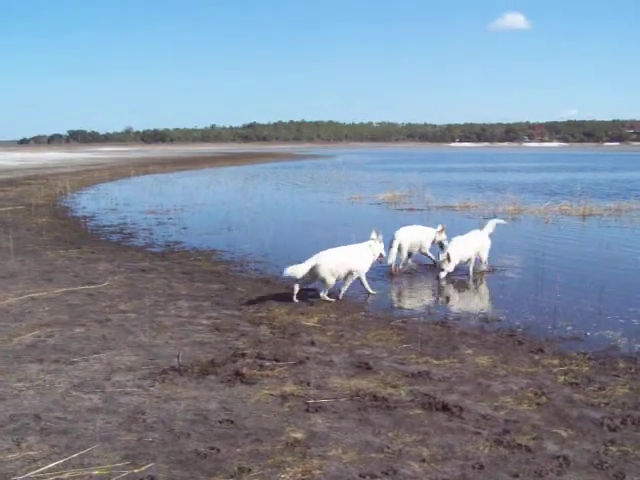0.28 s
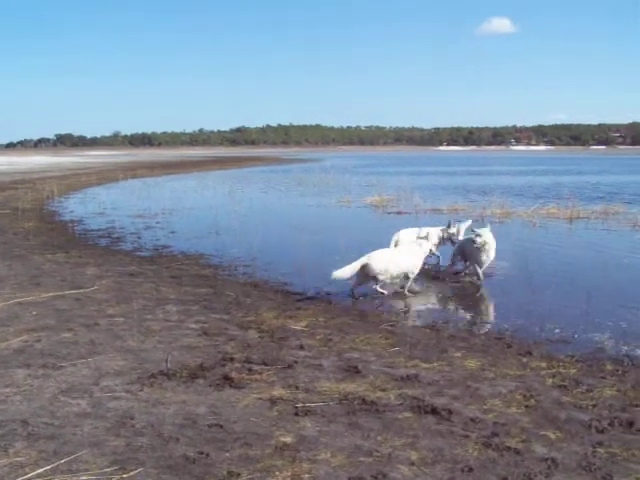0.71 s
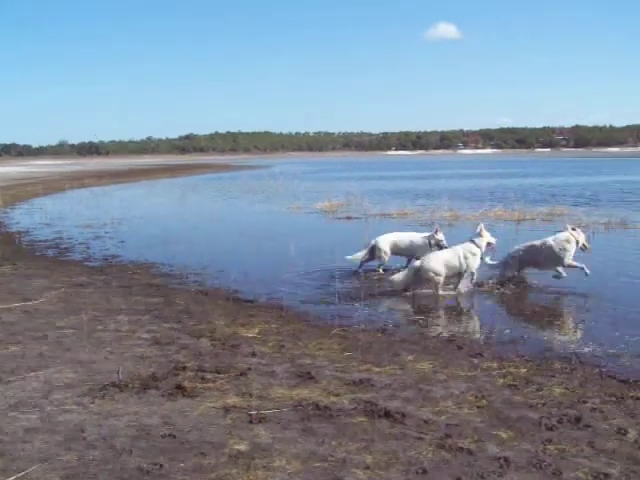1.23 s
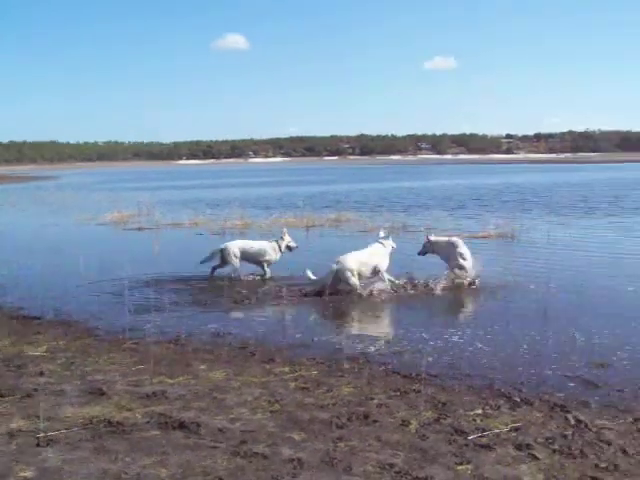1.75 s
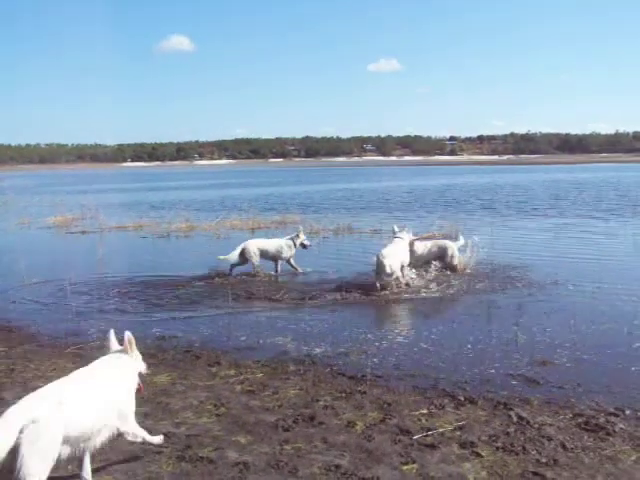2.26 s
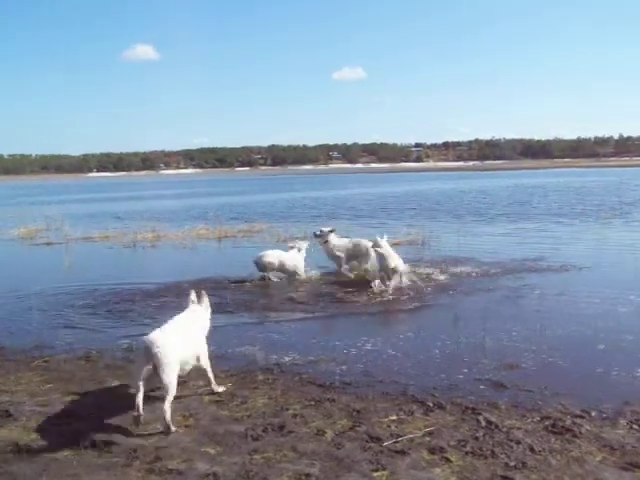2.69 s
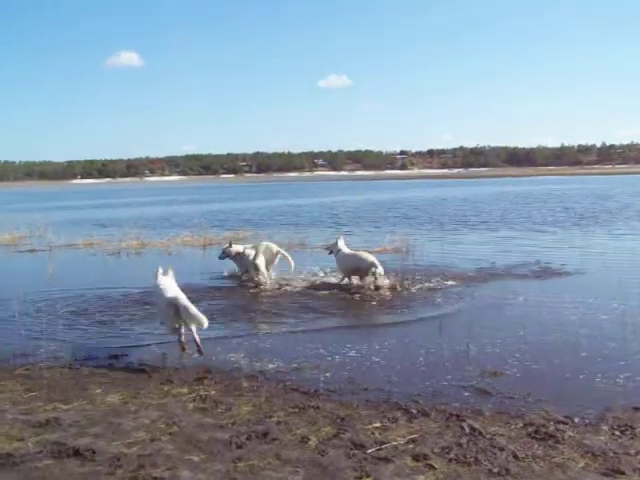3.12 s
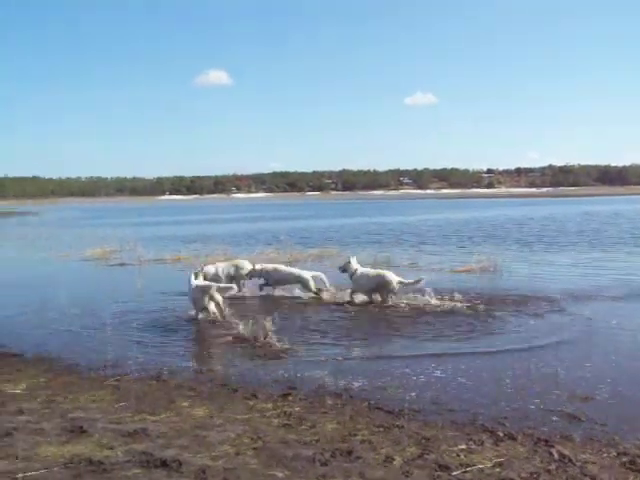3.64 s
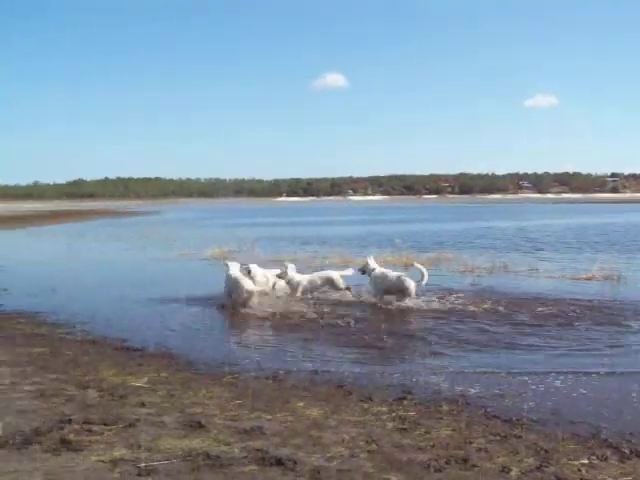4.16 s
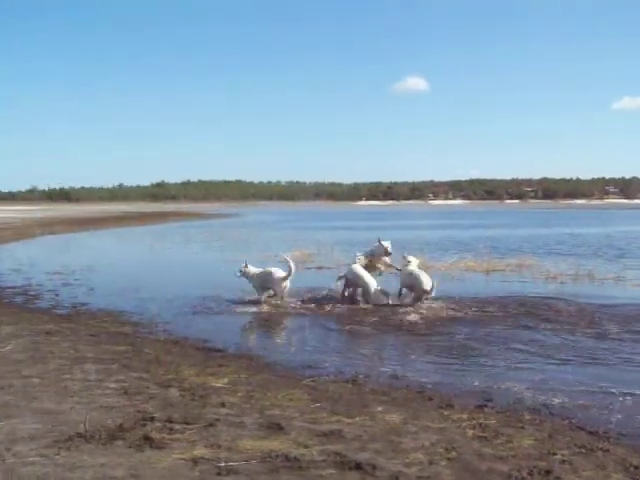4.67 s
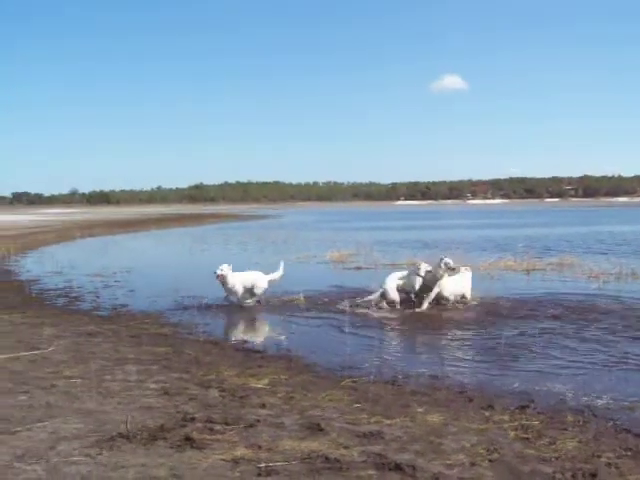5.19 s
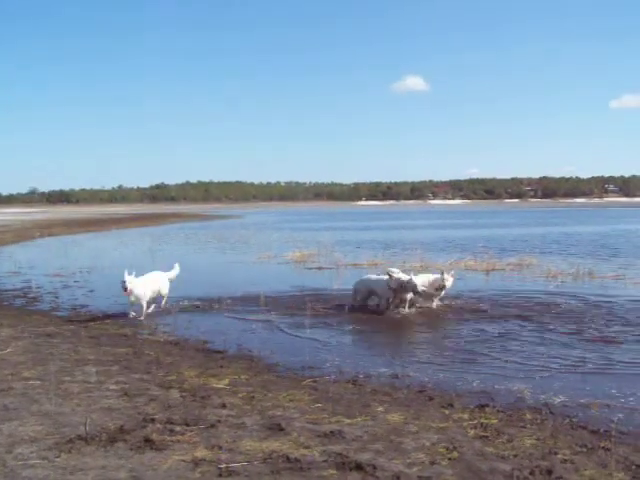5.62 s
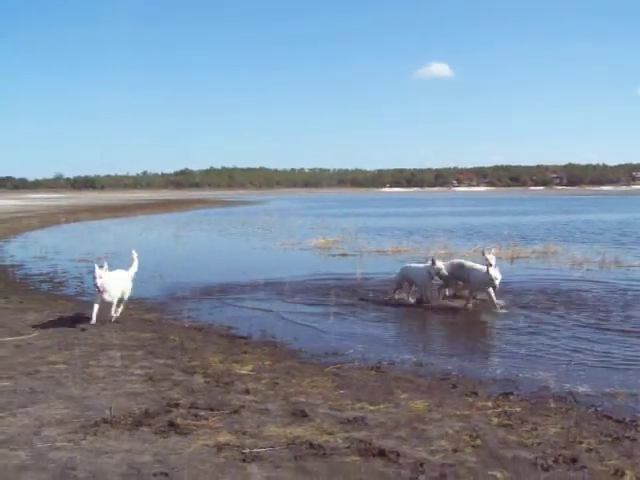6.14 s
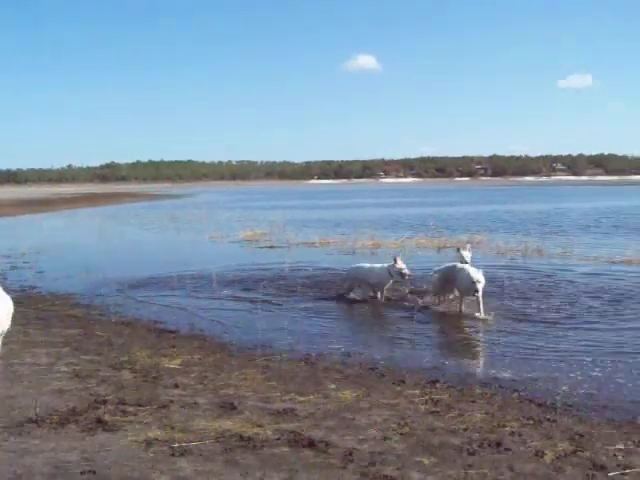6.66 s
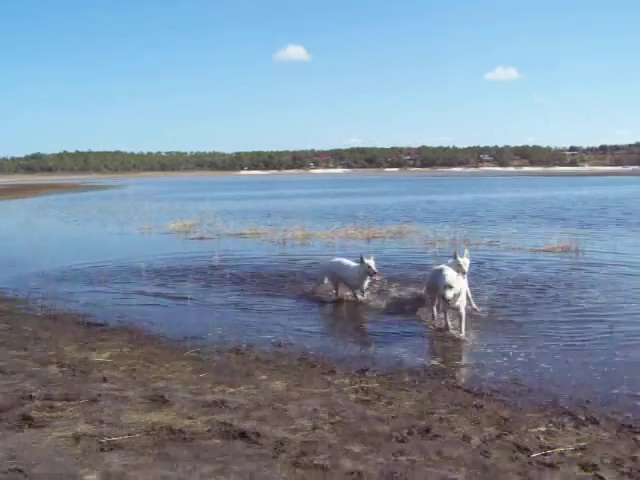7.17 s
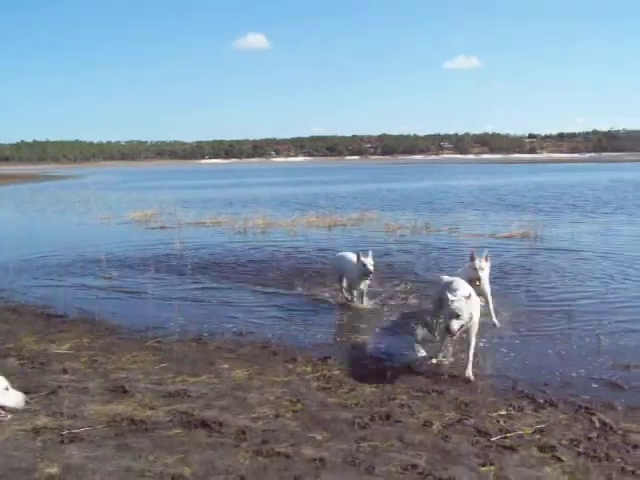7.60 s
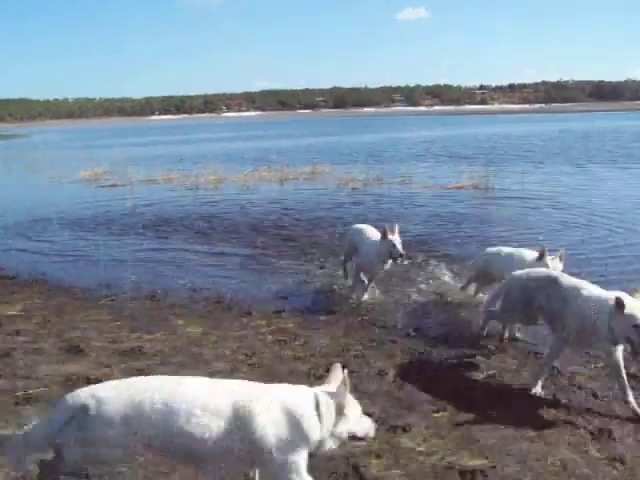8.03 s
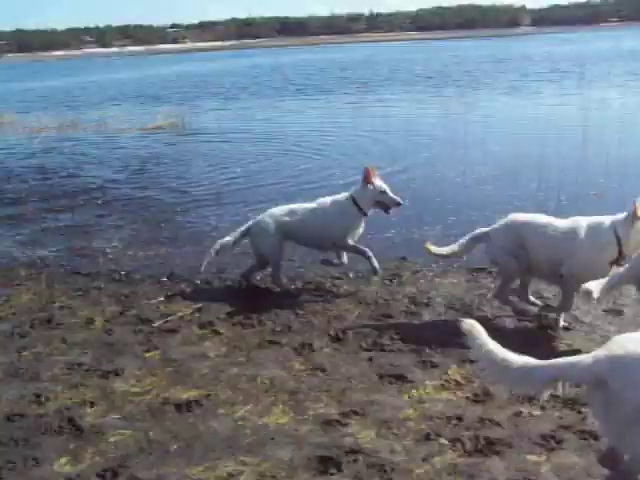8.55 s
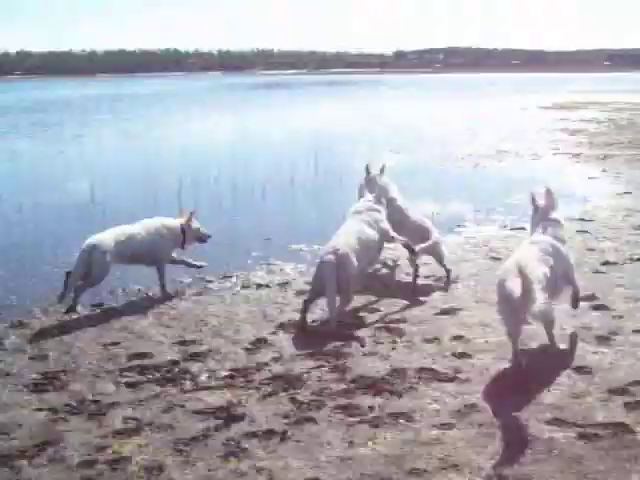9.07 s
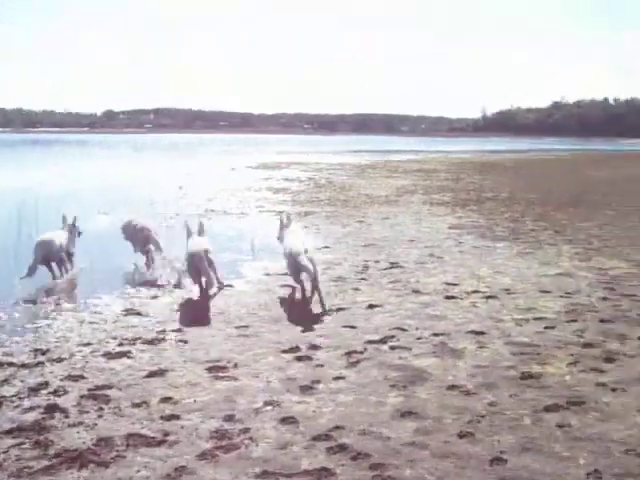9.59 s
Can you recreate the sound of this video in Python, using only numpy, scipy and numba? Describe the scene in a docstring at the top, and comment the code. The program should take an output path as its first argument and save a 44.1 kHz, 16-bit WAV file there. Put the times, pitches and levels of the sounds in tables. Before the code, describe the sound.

Rough low wind thumping on a camera microphone, dogs' paws slapping and churning lake shallows, splashes growing nearer and clearer as the wind fades.

```python
"""Lake shallows in the open air, dogs a few metres from a small camera, wind on its microphone port.
First hard eddies, swings of the diaphragm, overload the microphone while the dogs wade with light slaps.
Then they romp: torn noise makes the spray, short bursts the slaps, small rings the drops and bubbles.
Last they gallop out: spatter and hollow plunges come forward as the wind eases with the camera's turn."""
import sys
import numpy as np
from scipy import signal
from scipy.fft import rfft, irfft
from scipy.io import wavfile
from scipy.ndimage import uniform_filter1d
from numba import njit

SR = 44100
rng = np.random.default_rng(int(sys.argv[2]) if len(sys.argv) > 2 else 0)


def master(y):
    """Save y as 16-bit WAV."""
    cut = np.clip(np.atleast_2d(y).T, -1, 1)
    pcm = np.round(cut * 32767)  # scale
    wavfile.write(sys.argv[1], SR, pcm.astype(np.int16))


N = 433062  # length in samples

# how hard the dogs churn the water: start_s, spray level_db
CHURN = [(0.0, -45), (0.3, -37.5), (1.0, -34.5), (1.4, -30), (2.3, -24), (3.8, -23), (5.2, -26.5),
         (5.9, -28.5), (6.4, -28.5), (7.0, -25), (8.1, -26), (9.25, -27.5), (9.82, -26)]
# sheets of water thrown up by a leap: start_s, lift_db above the churn
SURGES = [(0.63, 8.5), (1.121, 7.5), (1.62, 3.5), (2.29, 3), (3.162, 3.5), (5.87, 4.5), (6.86, 3),
          (7.41, 0.5), (9.69, 6), (9.79, 6.5)]
SURGE_RISE_S, SURGE_FADE_S = 0.0032, 0.11
# brief dips in the splashing: middle_s, depth_db, half_length_s
LULLS = [(0.61, 3.5, 0.066), (1.874, 3.5, 0.021), (2.423, 4.5, 0.029), (3.549, 6, 0.045), (4.12, 5, 0.034),
         (5.442, 4, 0.12), (8.212, 1, 0.063), (9.39, 5, 0.05), (9.612, 5, 0.016), (9.753, 5.5, 0.03)]
SLOSH_SWING = 1.4  # dB the slosh drops per dB of lull
# the dogs rush the shore over this span: start_s, end_s
APPROACH_S = [7.4, 7.73]
# before and after the rush: far_db, near_db
MIST_DB, SLOSH_DB, SPATTER_DB = [-10.5, -8.5], [-8.5, -10], [-20, -9]
# paws slapping the surface: peak_s, level_db, pitch_hz
SLAPS = [(0.3035, -15, 2630), (0.6304, -15.5, 2153), (0.6561, -21, 2347), (0.7564, -16, 2090),
         (0.8649, -10.5, 2270), (1.0134, -11, 3220), (1.111, -13, 2780), (1.1528, -19, 2239),
         (1.171, -9, 2730), (1.6095, -11, 2650), (2.761, -6.5, 3600), (2.782, -9, 2670),
         (3.1556, -6.5, 3900), (3.667, -6, 3730), (3.804, -7, 2110), (3.847, -2.5, 3070),
         (3.9822, -7, 3670), (4.079, -2, 3700), (4.153, -10, 3900), (4.1898, -6, 3630), (4.5112, -6, 3570),
         (4.9065, -12, 2400), (5.074, -9, 3700), (5.2714, -8, 3580), (5.545, -7, 3580),
         (5.6726, -9.5, 3530), (5.7328, -12.5, 2465), (6.21, -7, 3400), (6.335, -8, 2870),
         (6.5545, -14, 2150), (6.6973, -6, 2906), (6.812, -8.5, 3360), (6.849, -6.5, 3930),
         (6.905, -9, 2900), (6.9484, -8, 3040), (7.039, -10, 3400), (7.13, -9.5, 2560), (7.2845, -7, 3240),
         (7.305, -7, 2480), (7.414, -6.5, 2880), (7.5463, -6, 3320), (7.697, -8.5, 3100), (7.727, -9, 2282),
         (7.8515, -9.5, 3670), (7.904, -9.5, 2140), (7.916, -8, 3780), (8.013, -9.5, 3000),
         (8.098, -10, 3000), (8.116, -8.5, 2200), (8.145, -12, 2560), (8.203, -10, 1900),
         (8.224, -14.5, 2040), (8.303, -9.5, 3060), (8.325, -12, 3400), (8.4115, -9.5, 1990),
         (8.425, -17, 3100), (8.4387, -13, 3620), (8.498, -9.5, 2700), (8.563, -8, 3300), (8.58, -14, 3000),
         (8.602, -11, 3640), (8.6536, -7, 2070), (8.6743, -10.5, 4758), (8.704, -7.5, 3660),
         (8.722, -15, 2900), (8.9258, -4.5, 2220), (8.9774, -14.5, 2217), (8.994, -14, 3500),
         (9.012, -14, 2810), (9.05, -17, 2400), (9.1618, -10, 2060), (9.2, -11.5, 2600),
         (9.2698, -13, 3466), (9.287, -11, 2799), (9.327, -10, 3300), (9.452, -12, 2500),
         (9.461, -4.5, 3000), (9.529, -9.5, 2120), (9.575, -12, 3220), (9.675, -12, 2160),
         (9.7812, -11, 2885)]
BURST_LOW_HZ, BURST_HIGH_HZ = 1100, 5300
# paws plunging close by, an air pocket closing: start_s, level_db, pitch_hz
PLUNGES = [(7.914, -18, 493), (8.014, -18, 576), (8.302, -21, 308), (8.325, -19, 496), (8.437, -8.5, 560),
           (8.504, -20, 490), (8.654, -20, 530), (8.901, -6, 513), (9.086, -14, 440), (9.269, -20, 353),
           (9.443, -14, 510), (9.46, -18, 450), (9.526, -19, 423), (9.651, -14, 442)]
# bodies ploughing through, water without a sharp front: middle_s, level_db, half_length_s, centre_hz
GUSHES = [(1.629, -24, 0.006, 1400), (2.884, -21, 0.0076, 1340), (5.571, -21.5, 0.0091, 3500),
          (5.848, -19, 0.012, 2960), (8.412, -22, 0.0051, 3000), (8.783, -20, 0.0088, 2280),
          (9.088, -21.5, 0.0073, 3430), (9.478, -22.5, 0.0079, 2400)]
GUSH_WIDTH = 1.3  # band edges as a factor either side of the centre
# brief bright ticks, many of them the bright edge of a slap: peak_s, level_db, pitch_hz
TICKS = [(0.8164, -21, 6440), (2.5689, -15, 6190), (3.1526, -19, 5600), (6.6447, -14.5, 6600),
         (7.0842, -16, 6460), (7.2598, -14.5, 6640), (7.5456, -14, 5500), (7.6055, -16, 6560),
         (7.7756, -14, 5500), (8.0156, -14, 5250), (8.1133, -10.5, 6560), (8.1996, -11.5, 6540),
         (8.3049, -13, 5500), (8.4995, -11, 5230), (8.6007, -16, 6270), (8.7813, -13, 6400),
         (8.9744, -14, 6590), (9.5261, -15, 6400)]
# short warbling water tones, one sweeping up steeply, one nearly level, one rising a little:
# start_s, start_hz, rise_factor, length_s, level_db
WATER_TONES = [(0.603, 896, 3.8, 0.036, -38), (8.478, 1206, 1.03, 0.06, -32),
               (9.488, 1097, 1.2, 0.014, -31)]
# colour of water sounds through the camera body, a notch near 800 Hz: pitch_hz, level_db
BODY = [(150, -29), (300, -9), (520, -6), (680, -11), (790, -19), (950, -7.5), (1250, -8), (1600, -9.5),
        (2150, -3), (2600, -5), (3600, -2), (3950, -6), (4400, -9.5), (5050, -7.5), (5800, -9),
        (6500, -5.5), (7600, -18.5), (8740, -39), (11400, -72.5)]
# wind on the port, gusts swelling and easing: start_s, level_db
WIND = [(0.0, -16), (1.3, -18.5), (2.1, -18.5), (3.0, -21.5), (3.5, -19), (3.85, -24), (4.5, -19.5),
        (5.2, -18), (5.85, -21), (6.15, -17), (6.85, -22.5), (7.1, -21.5), (7.45, -21.5), (7.55, -27),
        (8.4, -30.5), (9.0, -42.5), (9.35, -36), (9.82, -35)]
# deep rumble and sharp eddies against the wind: start_s, deep_db, sharp_db
WIND_TONE = [(0, -7, -9.5), (2, -17.5, -8.5), (2.8, -17, -7), (3.6, -22, -4), (4.3, -8.5, -6.5),
             (5.2, -4.5, -12), (7.4, -13, -11), (8.4, -1, -23), (9.1, 0.5, -1), (9.82, 1.5, -10)]
# spectrum of the wind's rumble: pitch_hz, level_db (per Hz, relative)
RUMBLE = [(12, -32.5), (20, -15.5), (64, -9), (119, 4), (248, -2.5), (400, -18), (520, -43.5), (880, -120)]
# hardest eddies on the port: peak_s, level_db, pitch_hz
BUFFETS = [(0.009, 0, 245), (0.0874, -3, 175), (0.1132, 0.5, 187), (0.1514, -2, 217), (0.171, 7, 312),
           (0.3508, 1.5, 179), (0.415, 5.5, 216), (0.473, 3, 167), (0.5233, 0.5, 239), (0.5869, 0.5, 170),
           (0.687, -1.5, 199), (0.7218, 0, 196), (0.7523, 2, 170), (0.839, 1, 207), (0.8989, 1, 155),
           (0.9548, -4.5, 202), (0.9723, -5, 225), (1.0153, 3, 246), (1.0926, -1, 154), (1.1115, 1, 245),
           (1.2444, -2.5, 192), (1.2795, 0, 243), (1.3832, -6, 229), (1.3995, -3, 176), (1.4357, -1.5, 177),
           (1.5931, -3, 241), (1.689, -3.5, 220), (1.736, -10, 260), (1.7746, 2, 217), (1.8407, -1.5, 166),
           (1.9323, -3, 218), (1.991, 2.5, 205), (2.0826, -1, 230), (2.3958, -8, 205), (2.6064, 0.5, 229),
           (2.9309, -3.5, 205), (2.9762, -5.5, 410), (3.0035, -5.5, 211), (3.4404, -5.5, 229),
           (3.4533, -1.5, 253), (3.5121, -2.5, 225), (4.05, -6.5, 412), (4.07, -7.5, 210),
           (4.4169, -7.5, 301), (4.4773, -6.5, 208), (4.695, -7.5, 149), (4.7374, -11, 255),
           (4.813, -6, 150), (4.8304, -3, 231), (4.9223, -1.0, 147), (4.9502, -3, 174), (4.9624, -2, 281),
           (5.022, -5.5, 230), (5.121, -4.5, 150), (5.1917, 0, 146), (5.209, 0.5, 153), (5.2484, -5.5, 209),
           (5.296, -5.5, 140), (5.3291, -3.5, 220), (5.409, -1, 190), (5.4501, -1.5, 241),
           (5.5741, -4, 170), (5.5906, -5.5, 240), (5.6834, -3.0, 188), (5.711, -3.5, 179),
           (6.0357, -0.5, 239), (6.1128, -5.5, 284), (6.1394, 3, 217), (6.1883, -4, 209),
           (6.3055, -3.5, 227), (6.347, -3, 231), (6.4204, -2.5, 186), (6.6356, -7.5, 176),
           (6.788, -1.5, 203), (6.9982, -5.5, 170), (7.0132, -9, 180), (7.0508, -2.5, 184),
           (7.117, -6.5, 284), (7.131, -7.5, 222), (7.4663, -6, 193)]
HEAVE_DB, HEAVE_PITCH = -9, 0.55  # slower heave around each hard eddy: dB and factor against that eddy
CLIP = .69  # level where the microphone input flattens (full scale = 1)
TOP_HZ = 8850  # top of the recorded band


def spray():
    """Sheets of water that tear in patches, falling drops, crackle, and bubbles that chirp upwards."""
    time_s = np.arange(N) / SR
    slosh_db = np.interp(time_s, APPROACH_S, SLOSH_DB)
    mist_db = np.interp(time_s, APPROACH_S, MIST_DB)
    crackle = scatter(count=14000, lo_hz=1440, hi_hz=9000, cycles=2.1, glide=0.58, tail_db=1.0)
    blips = scatter(count=1500, lo_hz=1310, hi_hz=8010, cycles=35.4, glide=1.35, tail_db=1.5)
    bubbles = scatter(count=500, lo_hz=996, hi_hz=7380, cycles=55, glide=1.5, tail_db=0.5)
    # handfuls of drops land together
    when, size = rng.random((700, 2)).T
    falls = 0.98 + puffs(when * (N - 1) / SR, 6.5 * size - 7.0, rise_s=0.0018, fade_s=0.0018)
    patches = undb(1.1 * walk(40))
    torn = patches * falls * (rng.standard_normal(N) + .5 * crackle)
    water = colour(unit(torn) + 0.26 * blips + 0.18 * bubbles, BODY)
    # each band of pitch comes and goes on its own, as drops of one size would
    bands = split(water, [600, 1350, 1950, 3300, 3950, 4500, 5600, 7000])
    bands = [part * undb(1.0 * walk(9) + 1.08 * walk(35)) for part in bands]
    # the finest mist arrives in short puffs
    mist = unit(sum(bands[5:]) * undb(0.37 * walk(10) + 1.5 * walk(90)))
    slosh = unit(sum(bands[:2]))
    sheet = unit(sum(bands[2:5]))
    low = undb(churn(SLOSH_SWING) + slosh_db) * slosh
    return low + undb(churn(1)) * (sheet + undb(mist_db) * mist)


def churn(swing):
    """Spray level in dB: the slow effort, lifted at once by each leap and sagging in each lull."""
    t = np.arange(0, N / SR + .002, .002)  # every 2 ms
    effort_db = np.interp(t, *np.transpose(CHURN))
    lift = sum(up * np.exp(np.minimum((t - s) / SURGE_RISE_S, (s - t) / SURGE_FADE_S)) for s, up in SURGES)
    sag = sum(down * np.exp(-((t - s) / half) ** 2) for s, down, half in LULLS)
    return np.interp(np.arange(N) / SR, t, effort_db + lift - swing * sag)


def slaps():
    """Each slap: a few quick swings at its pitch inside a broad burst of torn water, then spatter."""
    s, db, _ = np.transpose(SLAPS)
    grain = undb(2.0 * walk(500)) * band(rng.standard_normal(N), BURST_LOW_HZ, BURST_HIGH_HZ, order=1)
    # the mix of coarse and fine drops keeps changing
    grain = sum(part * undb(3.0 * walk(60)) for part in split(grain, [1500, 2300, 3500, 5200, 6800]))
    spatter_db = np.interp(s, APPROACH_S, SPATTER_DB)
    burst = puffs(s, db - 15.5, rise_s=0.0015, fade_s=0.0018)
    spatter = puffs(s, db + spatter_db, rise_s=0.0022, fade_s=0.0053)
    splash = colour((burst + spatter) * grain, BODY) / np.std(colour(grain, BODY))
    return splash + swings(SLAPS, turns=1.66, edge=0.81)


def plunges():
    """A closing air pocket rings as a hollow plop that dies within a few cycles."""
    s, db, hz = np.transpose(PLUNGES)
    plops = rings(N, s, hz, 8.6 + 0 * s, 0.98 + 0 * s, undb(db))
    return band(plops, 120, 1500, order=1)


def gushes():
    """Each gush is rough noise around its centre that swells and ebbs."""
    t = np.arange(N) / SR
    rough = undb(2.9 * walk(300)) * rng.standard_normal(N)
    out = np.zeros(N)
    for at, level_db, half, hz in GUSHES:
        swell = np.exp(-((t - at) / half) ** 2)
        out += undb(level_db) * swell * unit(band(rough, hz / GUSH_WIDTH, hz * GUSH_WIDTH))
    return out


def ticks():
    """Brief bright ticks around 5 to 6.6 kHz, each a few swings that swell and die quickly."""
    return swings(TICKS, turns=3.8, edge=1.1)


def water_tones():
    """Short water tones that swell, warble in level and pitch and die, each with its own rise."""
    out = np.zeros(N)
    warble, wobble = undb(4.5 * walk(140)), 1 + 0.04 * walk(120)  # of level, of pitch
    for at, hz, rise, length, level_db in WATER_TONES:
        i = np.arange(int(at * SR), int((at + length) * SR))
        part = (i / SR - at) / length
        swell = np.abs(np.sin(np.pi * part)) ** 0.56
        turns = np.cumsum(hz * rise ** part * wobble[i]) / SR
        out[i] += undb(level_db) * swell * np.sin(2 * np.pi * turns)
    return out * warble


def wind():
    """Eddies of all sizes pass the port, each a push and a rebound, bunched in flutters over a deep rumble."""
    level_db, = curves(WIND)
    deep_db, sharp_db = curves(WIND_TONE)
    flutter = 1.5 * np.tanh(walk(28) / 1.5)  # soft limit on the swings
    deep = unit(band(rng.standard_normal(N), 34, 75))
    rumble = unit(colour(rng.standard_normal(N), RUMBLE))
    big = scatter(count=1100, lo_hz=81.3, hi_hz=243.5, cycles=7.4, glide=0.3, tail_db=1.5)
    small = scatter(count=2200, lo_hz=257.0, hi_hz=646, cycles=8.4, glide=0.67, tail_db=3.5)
    eddies = unit(undb(1.6 * flutter) * (0.55 * rumble + big))
    sharp = unit(undb(3.5 * flutter + 2.5 * walk(60)) * small)
    push = undb(level_db) * (undb(deep_db) * deep + eddies + undb(sharp_db) * sharp)
    # the diaphragm is pushed smoothly, and a vent bleeds off the slowest pressure
    return band(push, 33, 610, order=3) + buffets()


def buffets():
    """Each hard eddy is one sharp swing of the diaphragm inside a slower heave and rebound."""
    heaves = [(s, db + HEAVE_DB, hz * HEAVE_PITCH) for s, db, hz in BUFFETS]
    return swings(BUFFETS, turns=0.34, edge=1.13) + swings(heaves, turns=0.76, edge=1.54)


def swings(table, turns, edge):
    """Each row swells to a few swings at its pitch, at a random phase, and dies as quickly."""
    out = np.zeros(N)
    phases = rng.random(len(table))
    for (at, level_db, hz), phase in zip(table, phases):
        i = np.arange(max(int((at - .03) * SR), 0), min(int((at + .03) * SR), N))  # 30 ms either side
        t = i / SR - at
        swell = np.exp(-np.abs(t * hz / turns) ** edge)
        out[i] += undb(level_db) * swell * np.cos(2 * np.pi * (hz * t + phase))
    return out


def scatter(count, lo_hz, hi_hz, cycles, glide, tail_db):
    """Many small rings at random times and pitches, a few of them bigger by up to 4 * tail_db."""
    when, pitch, rarity, sign = rng.random((count, 4)).T
    size = undb(tail_db * np.minimum(-np.log(1 - rarity), 4)) * np.sign(sign - .5)
    hz = lo_hz * (hi_hz / lo_hz) ** pitch
    one = np.ones(count)
    return unit(rings(N, when * N / SR, hz, cycles * one, glide * one, size))


@njit
def rings(n, at, hz, cycles, glide, size):
    """Damped sines that lose 60 dB in so many cycles while the pitch slides by the factor glide."""
    out = np.zeros(n)
    for k in range(len(at)):
        length = int(cycles[k] * SR / hz[k])
        step = 2 * np.pi * hz[k] / SR
        fade = np.exp(-np.log(1000.) / length)
        slide = glide[k] ** (1. / length)
        i, phase, a = int(at[k] * SR), 0., size[k]
        for j in range(i, min(i + length, n)):
            out[j] += a * np.sin(phase)
            phase, step, a = phase + step, step * slide, a * fade
    return out


def puffs(s, db, rise_s, fade_s):
    """Envelope of bursts that peak at the given times."""
    marks = np.zeros(N)
    np.add.at(marks, (s * SR).astype(int), undb(db))
    t = np.arange(-441, 2206) / SR  # 10 ms before the peak to 50 ms after
    shape = np.where(t < 0, np.exp(t / rise_s), np.exp(-t / fade_s))
    return signal.fftconvolve(marks, shape)[441:441 + N]


def walk(rate):
    """Random levels held 1 / rate s and slewed twice; rms 1."""
    k = int(SR / rate)
    held = np.repeat(rng.standard_normal(N // k + 1), k)
    return unit(uniform_filter1d(uniform_filter1d(held, k), k)[:N])


def split(x, centres_hz):
    """Overlapping bands that add up to x again."""
    spec = rfft(x)
    at = np.log(np.arange(N // 2 + 1) * SR / N + 1)
    return [irfft(spec * np.interp(at, np.log(centres_hz), row), N) for row in np.eye(len(centres_hz))]


def colour(x, points):
    """Causal minimum-phase filter, built by way of the cepstrum, that follows (Hz, dB) points."""
    hz, db = np.transpose(points)
    size = 8192
    grid = np.log(np.arange(size // 2 + 1) * SR / size + 1)
    log_gain = np.interp(grid, np.log(hz), db) * np.log(10) / 20
    cep = irfft(log_gain)
    cep = np.r_[cep[0], 2 * cep[1:size // 2], np.zeros(size // 2)]  # fold onto positive time
    return signal.fftconvolve(x, irfft(np.exp(rfft(cep))))[:N]


def band(x, lo_hz, hi_hz, order=2):
    """Butterworth band-pass."""
    return signal.sosfilt(signal.butter(order, [lo_hz, hi_hz], "band", fs=SR, output="sos"), x)


def curves(table):
    """Columns of a table joined by straight lines in time."""
    s, *columns = np.transpose(table)
    return [np.interp(np.arange(N) / SR, s, c) for c in columns]


def undb(db):
    """dB to gain."""
    return 10 ** (np.asarray(db) / 20)


def unit(x):
    """Scale to rms 1."""
    return x / np.sqrt(np.mean(x ** 2))


def scene():
    """Water heard in the open air, with no echo, under wind on the port."""
    water = spray() + slaps() + plunges() + gushes() + ticks() + water_tones()
    return (water + wind())[None]


def record(dry):
    """The microphone input clips flat, then the top is cut."""
    clipped = np.clip(dry, -CLIP, CLIP)
    return signal.sosfilt(signal.ellip(10, .2, 80, TOP_HZ, fs=SR, output="sos"), clipped)


dry = scene()
out = record(dry)
master(out)
```